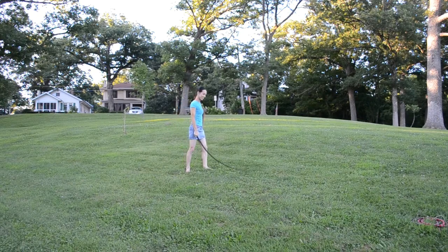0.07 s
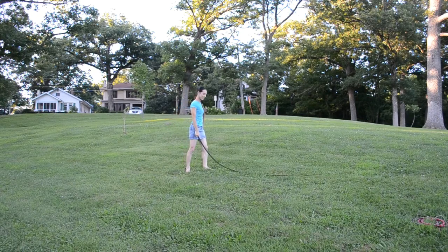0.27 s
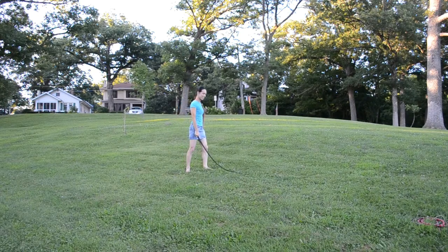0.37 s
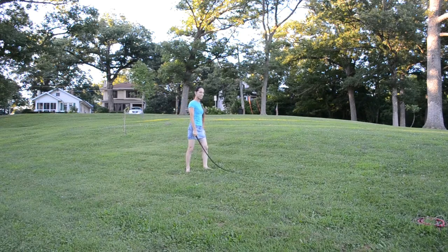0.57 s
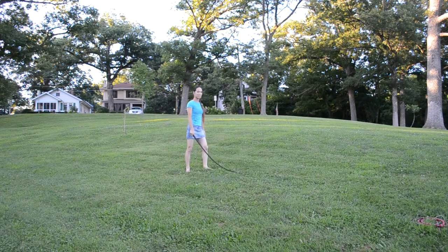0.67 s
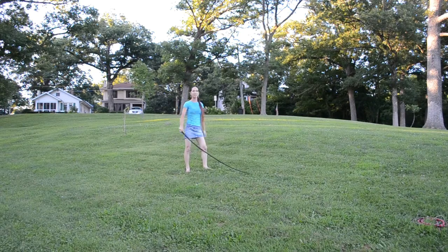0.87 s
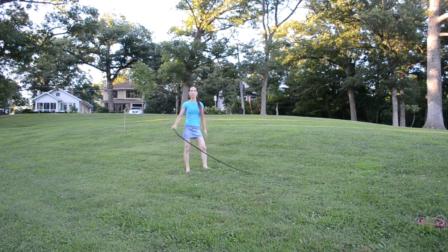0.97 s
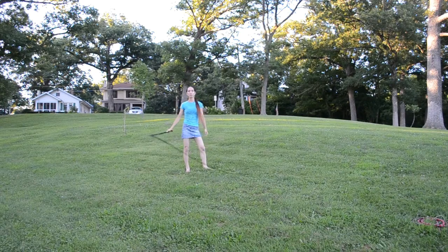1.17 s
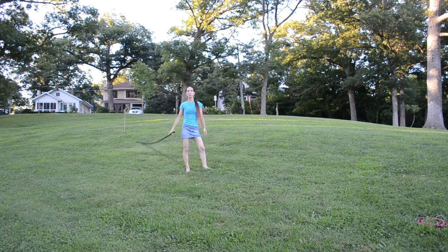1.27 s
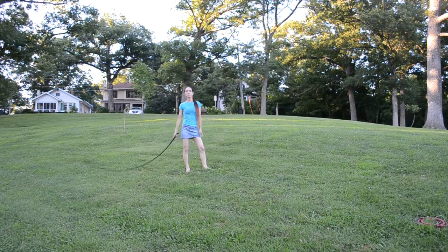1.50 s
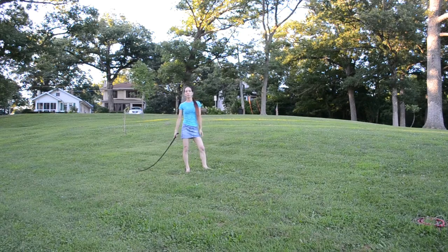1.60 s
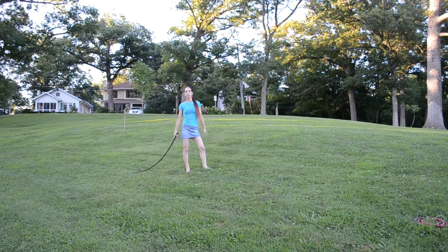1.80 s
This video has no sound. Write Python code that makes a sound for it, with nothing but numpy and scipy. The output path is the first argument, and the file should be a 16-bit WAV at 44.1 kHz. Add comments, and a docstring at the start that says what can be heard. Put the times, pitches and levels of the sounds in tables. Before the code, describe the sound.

Whip crack on an open lawn: faint tick and wind thumps first, then one hard, overloaded crack, clustered echoes and a fading hiss, faint bird whistles, and late light clicks around a dull snap.

```python
"""Soft outdoor air, a faint tick and low wind pops come first, then a whip cracks once on an open lawn.
The crack is a run of pressure jumps; trees and houses return it as coloured fronts and a fading noise hiss.
Shaped noise makes the air, wind rumble, far insects, rustles and one low hum; gliding sines, the far whistles.
Later comes a duller snap, a rounded push with short ringing modes, among small damped-sine ticks."""
import sys
import numpy as np
from scipy import signal
from scipy.io import wavfile

SR = 44100
rng = np.random.default_rng(int(sys.argv[2]) if len(sys.argv) > 2 else 0)


def pcm_store(signal):
    """Save signal as 16-bit PCM."""
    levels = np.round(np.clip(np.atleast_2d(signal), -1, 1) * 32767)
    wavfile.write(sys.argv[1], SR, levels.astype(np.int16).T)


N = 81585  # length in samples

# Spectrum of the open air, shape only: pitch_hz, level_db (per Hz)
AIR_SPECTRUM = [(40, -23), (80, -13.5), (200, -11), (500, -6), (1000, -6.5), (1500, -12.5), (2500, -15),
                (4500, -21), (8000, -25.5), (10000, -26.5), (11500, -32.5)]
AIR_DB = -56.5
INSECT_HZ, INSECT_WIDTH_HZ, INSECT_DB = 5650, 580, -69
AIR_DROOP_HZ = 9700

# Loudness curve of the wind rumble: time_s, level_db
WIND_CURVE = [(0.0, -53), (0.108, -50.5), (0.144, -57.5), (0.23, -56), (0.272, -47), (0.35, -65),
              (0.412, -50.5), (0.534, -54.5), (0.582, -46.5), (0.716, -67), (0.736, -56.5), (0.86, -56.5),
              (0.9, -75.5), (1.02, -61.5), (1.046, -69), (1.2, -58), (1.328, -70), (1.426, -54.5),
              (1.458, -62), (1.736, -64.5), (1.756, -76), (1.85, -71)]
WIND_LOW_HZ, WIND_HIGH_HZ, WIND_LUMPS_DB = 44.6, 131.4, 3
# Wind pops on the microphone: centre_s, level_db, pitch_hz, width_ms (at half height)
WIND_POPS = [(0.075, -30, 230, 2.5), (0.081, -28.5, 179, 6), (0.0932, -38, 172, 4), (.104, -23, 194, 3.7),
             (0.12, -50, 149, 3.8), (0.1855, -55, 177, 5), (0.2791, -28, 129, 6), (0.286, -26, 155, 4.8),
             (0.414, -47.5, 132, 5.7), (0.4293, -35, 155, 6.9), (0.46, -51, 164, 4.4),
             (0.5005, -37.5, 156, 5.3), (0.529, -41, 167, 5.2), (0.552, -31, 263, 2.1),
             (0.556, -46, 198, 3), (0.5838, -26.5, 179, 2.95), (0.597, -56, 136, 3.4),
             (0.6258, -38.5, 167, 6.6), (0.6655, -38.5, 208, 2.8), (0.7438, -39, 155, 7.9),
             (0.802, -37.5, 148, 3.7), (0.849, -39.5, 200, 3.3), (1.1503, -44, 142, 7.2),
             (1.191, -43, 197, 3.3), (1.234, -45, 203, 3.6), (1.4264, -44.5, 138, 4.9),
             (1.6468, -48.5, 166, 4.1), (1.716, -43, 277, 2.6)]
POP_PHASE_RAD = 1.35  # push first, then suction

# Falling whistles, mostly birds: start_s, length_s, from_hz, to_hz, level_db
WHISTLES = [(.672, .065, 2000, 1880, -66), (0.712, 0.035, 4190, 4170, -71), (.73, 0.028, 3720, 2870, -75),
            (0.83, 0.036, 3760, 2710, -71), (0.934, 0.048, 3780, 2420, -69),
            (1.044, .044, 3770, 2650, -69.5), (1.647, .017, 1420, 1050, -57), (1.75, .035, 2350, 2120, -70),
            (1.812, .016, 4080, 4060, -66), (1.824, .028, 4060, 2750, -64),
            (1.216, 0.053, 2394, 2356, -66.5), (1.268, .09, 2300, 1720, -70),
            (1.36, .11, 1702, 1600, -69.5)]
WHISTLE_HOLD = 1.1  # exponent: above 1 the pitch lingers at the top before it falls
WHISTLE_FLUTTER_DB = 1.5

# Rustles, and one low narrow hum near 300 Hz: centre_s, length_s, level_db, low_hz, high_hz
RUSTLE_AND_HUM_SWELLS = [(0.038, 0.017, -63.5, 1000, 10700), (1.292, 0.19, -63.5, 279, 330),
                         (0.193, 0.047, -55, 500, 2500), (0.243, 0.015, -44, 1000, 10000),
                         (0.289, 0.019, -42, 1480, 3940), (0.633, 0.11, -62.5, 2770, 4170),
                         (1.426, 0.094, -67, 6450, 10900), (1.408, .05, -67.5, 7040, 7800),
                         (1.6, 0.069, -76, 700, 2000), (1.63, 0.012, -46.5, 700, 3000),
                         (1.669, 0.017, -50.5, 1000, 4370), (1.697, 0.012, -47.5, 1200, 10500),
                         (1.728, 0.03, -57, 2100, 2600), (1.735, 0.046, -63, 3920, 4430)]

# Small ticks: start_s, level_db, pitch_hz, t60_s
SMALL_TICKS = [(.032, -44.5, 1550, 0.0088), (.1598, -25.5, 870, 0.0022), (1.532, -45.5, 950, 0.022),
               (1.5484, -33.5, 1230, 0.0037), (1.561, -35.5, 1204, 0.02), (1.5824, -38, 900, 0.0076),
               (1.5995, -42, 1210, .008), (1.6625, -37, 930, 0.014), (1.6628, -36, 3000, 0.009),
               (1.6626, -38, 1950, .008), (1.7908, -30, 610, 0.0089), (1.8365, -48, 710, .012)]
TICK_CUT_HZ = 480  # low cut shared with the snap's ring and hiss

# Ringing modes of the duller snap: pitch_hz, level_db, t60_s
SNAP_RINGS = [(633, -22, 0.011), (960, -35.5, 0.02), (1630, -22.5, 0.0096), (2740, -31, 0.0075),
              (3400, -34, .007)]
SNAP_S, SNAP_DB, SNAP_MS, PUSH_CUT_HZ = 1.63205, -7.5, 0.11, 360
SNAP_HISS_DB, SNAP_HISS_T60_S = -33, 0.019
SNAP_TAIL_DB, SNAP_TAIL_T60_S = -54, 0.71

# Spectrum of the scattered return, shape only: pitch_hz, level_db (per Hz)
TAIL_SPECTRUM = [(300, -9.5), (500, -3), (700, -18), (1000, -5), (1600, -3), (2400, -8), (5000, -8),
                 (9200, -7.5), (11500, -26)]
# Fade of the scattered return across the spectrum: pitch_hz, t60_s
TAIL_FADE = [(500, 1.55), (1500, 1), (3000, 1.69), (5500, 0.85), (8000, 0.62), (11000, 0.36)]
TAIL_START_S, TAIL_DB, TAIL_LUMPS_DB = .2045, -45, 2
# Loudness curve of the late narrow return from far off: time_s, level_db
FAR_CURVE = [(0.564, -58), (.6, -58), (.65, -59), (.685, -55), (.72, -62), (.74, -74), (.9, -66.5),
             (.96, -75), (.98, -78)]
FAR_HZ, FAR_WIDTH_HZ, FAR_BREAKS_DB = 1872, 315, 3

# Echoes off trunks and walls: arrival_s, level_db, centre_hz, smear_t60_s
ECHO_RETURNS = [(0.2078, -28, 2800, 0.045), (0.225, -27, 2720, 0.01), (0.2306, -34, 3020, 0.011),
                (.2429, -24, 1940, 0.039), (0.2514, -32, 2500, 0.018), (0.2661, -21.5, 2200, 0.021),
                (0.2717, -26, 2280, 0.026), (0.2788, -27.5, 2350, 0.019), (0.285, -29, 2500, 0.03),
                (.2905, -33, 2600, .06), (0.345, -38, 1770, 0.05), (0.376, -43, 2000, 0.04),
                (0.464, -51, 1500, 0.015), (0.5632, -33, 2300, .012), (.618, -47, 2440, 0.018),
                (.625, -45, 3000, 0.023)]
ECHO_TOP_DB, ECHO_TOP_HZ, ECHO_GRAIN_DB = -10, 7000, 3  # treble edge and grain of each echo

# Shock fronts of the whip tip and its bounces off the grass:
# arrival_s, level_db, suction_before_ms, push_after_ms
SHOCK_FRONTS = [(.20377, 2.5, .32, .39), (.2045, -2, .29, .12), (.20472, -1, .04, .06),
                (.20495, 1, .07, .11), (.20523, -5, .11, .06), (.2055, -12, .13, .03),
                (.20615, -14, .06, .24), (.20678, -18, .38, .42), (.20755, -23, .3, .2)]
CRACK_FRAY_DB, CRACK_FRAY_T60_S = -17, .009  # ragged noise behind the fronts
THUMP_HZ, THUMP_DB, THUMP_T60_S = 430, -15, .013  # low body of the crack
BODY_CUT_HZ = 220

OVERLOAD = .8  # level the input saturates towards
MIC_DROOP_HZ, CUTOFF_HZ = 11480, 12000


def amp(db):
    """Decibels to linear gain."""
    return 10 ** (np.asarray(db) / 20)


def unit(x):
    """Scale to an rms of 1."""
    return x / np.sqrt(np.mean(x ** 2) + 1e-20)


def at_hz(points, hz):
    """Read a curve along a logarithmic pitch axis."""
    pitches, values = np.array(points).T
    return np.interp(np.log(hz), np.log(pitches), values)


def band(x, low_hz, high_hz):
    """Keep what lies between two pitches."""
    sos = signal.butter(2, [low_hz, min(high_hz, SR * .45)], "band", fs=SR, output="sos")
    return signal.sosfilt(sos, x)


def cut(x, hz, kind, order):
    """Low-pass or high-pass filter."""
    return signal.sosfilt(signal.butter(order, hz, kind, fs=SR, output="sos"), x)


def band_noise(low_hz, high_hz):
    """Steady noise between two pitches, rms 1."""
    return unit(band(rng.standard_normal(N), low_hz, high_hz))


def drift(rate_hz):
    """Random wander of spread 1: noise through two equal one-pole smoothers."""
    r = np.exp(-2 * np.pi * rate_hz / SR)
    wander = signal.lfilter([1], [1, -2 * r, r * r], rng.standard_normal(N + SR))
    return unit(wander[SR:])  # the first second lets the smoother settle


def decay(t, t60):
    """Silent before 0, then dying away by 60 dB per t60."""
    return (t >= 0) * amp(-60 * np.clip(t, 0, None) / t60)


def shock(t, before_ms, after_ms):
    """Suction that deepens, a jump, a push that fades."""
    jump = np.tanh(2 * t * SR)
    suction = 1.71 * (1 + 1000 * t / before_ms)
    push = 1 - (1000 * t / after_ms) ** 2
    return jump * np.clip(np.where(t < 0, suction, push), 0, None)


def coloured(spectrum, gain):
    """Third-octave bands of noise, each with its own level and moving gain."""
    edges = 30 * 2 ** (np.arange(27) / 3)
    mids = np.sqrt(edges[1:] * edges[:-1])
    levels = amp(at_hz(spectrum, mids))
    white = rng.standard_normal((2, N))  # neighbouring bands take different noise
    out = np.zeros(N)
    for k, (hz, level) in enumerate(zip(mids, levels)):
        out += level * gain(hz) * band(white[k % 2], edges[k], edges[k + 1])
    return out / np.sqrt(np.sum(levels ** 2 * np.diff(edges)) * 2 / SR)


def air():
    """Far traffic and leaves as drifting noise bands, with a narrow hiss of insects."""
    bed = amp(AIR_DB) * coloured(AIR_SPECTRUM, lambda hz: amp(1.83 * drift(9.3)))
    insects = band_noise(INSECT_HZ - INSECT_WIDTH_HZ / 2, INSECT_HZ + INSECT_WIDTH_HZ / 2)
    insects *= amp(INSECT_DB + 1.65 * drift(20))
    return cut(bed + insects, AIR_DROOP_HZ, "low", order=6)


def wind(t):
    """Single low pops, short bell-shaped bursts of a sine, over a lumpy noise rumble."""
    level_db = np.interp(t, *np.transpose(WIND_CURVE)) + WIND_LUMPS_DB * drift(32.5)
    out = amp(level_db) * band_noise(WIND_LOW_HZ, WIND_HIGH_HZ)
    for s, db, hz, ms in WIND_POPS:
        bell = np.exp(-np.log(16) * (1000 * (t - s) / ms) ** 2)
        out += amp(db) * bell * np.cos(2 * np.pi * hz * (t - s) + POP_PHASE_RAD)
    return out


def whistles(t):
    """Sines that glide downward, swelling and fading, with a fluttering level."""
    out = np.zeros(N)
    for s, length, from_hz, to_hz, db in WHISTLES:
        u = np.clip((t - s) / length, 0, 1)
        hz = from_hz + (to_hz - from_hz) * np.sin(np.pi / 2 * u ** WHISTLE_HOLD) ** 2
        swell = np.sin(np.pi * u) ** 0.38
        out += amp(db + 6.5) * swell * np.sin(2 * np.pi * np.cumsum(hz) / SR)
    return out * amp(WHISTLE_FLUTTER_DB * drift(40))


def rustles_and_hum(t):
    """Bell-shaped swells of grainy noise: short rustles, and a low hum where the band is narrow near 300 Hz."""
    grains = rng.standard_normal(N) * amp(2.2 * drift(216))
    out = np.zeros(N)
    for s, length, db, low_hz, high_hz in RUSTLE_AND_HUM_SWELLS:
        swell = np.exp(-(2 * (t - s) / length) ** 2)
        out += amp(db) * swell * unit(band(grains, low_hz, high_hz))
    return out


def ring(t, s, db, hz, t60):
    """One struck mode: a sine that starts at once and dies away."""
    return amp(db) * decay(t - s, t60) * np.sin(2 * np.pi * hz * (t - s))


def ticks(t):
    """Small damped ticks, one ringing mode each."""
    out = sum(ring(t, *tick) for tick in SMALL_TICKS)
    return cut(out, TICK_CUT_HZ, "high", order=2)


def snap(t):
    """A rounded push with short ringing modes, a brief hiss and a longer scatter of noise."""
    u = 1000 * (t - SNAP_S) / SNAP_MS
    push = amp(SNAP_DB) * (np.exp(-u ** 2) - 0.3 * np.exp(-(u / 3.67) ** 2))
    hiss = amp(SNAP_HISS_DB) * decay(t - SNAP_S, SNAP_HISS_T60_S) * band_noise(4200, 9000)
    scatter = amp(SNAP_TAIL_DB) * decay(t - SNAP_S, SNAP_TAIL_T60_S) * band_noise(620, 6300)
    modes = sum(ring(t, SNAP_S, db, hz, t60) for hz, db, t60 in SNAP_RINGS)
    fade = cut(hiss + scatter + modes, TICK_CUT_HZ, "high", order=2)
    return cut(push, PUSH_CUT_HZ, "high", order=3) + fade


def tail(t):
    """Scatter from leaves and trunks, its fade time set by pitch, and one late narrow return."""
    lumps = amp(TAIL_DB + TAIL_LUMPS_DB * drift(40))
    near = lumps * coloured(TAIL_SPECTRUM, lambda hz: decay(t - TAIL_START_S, at_hz(TAIL_FADE, hz)))
    far = band_noise(FAR_HZ - FAR_WIDTH_HZ / 2, FAR_HZ + FAR_WIDTH_HZ / 2)
    s, db = np.transpose(FAR_CURVE)
    far_db = np.interp(t, s, db, -120, -120) + FAR_BREAKS_DB * drift(50)
    return near + amp(far_db) * far


def echoes(t):
    """Each reflector returns a short front and a smear of noise, in its own colour."""
    out = np.zeros(N)
    grains = unit(rng.standard_normal(N) * amp(ECHO_GRAIN_DB * drift(390)))
    for s, db, hz, t60 in ECHO_RETURNS:
        i = slice(int(s * SR) - 50, int(s * SR) + 4000)  # work only around this echo
        u = t[i] - s
        back = shock(u, 450 / hz, 500 / hz) + 0.87 * decay(u, t60) * grains[i]
        body = band(back, hz / 1.85, hz * 1.63)
        treble = amp(ECHO_TOP_DB) * band(back, hz * 1.43, ECHO_TOP_HZ)
        out[i] += amp(db) * (body + treble)
    return out


def crack(t):
    """The tip breaks the sound barrier: a run of shock fronts with a low thump and ragged noise behind."""
    fronts = sum(amp(db) * shock(t - s, before, after) for s, db, before, after in SHOCK_FRONTS)
    fray_s = SHOCK_FRONTS[1][0]  # the noise starts with the second front
    fray = amp(CRACK_FRAY_DB) * decay(t - fray_s, CRACK_FRAY_T60_S) * band_noise(1200, 9000)
    thump = ring(t, SHOCK_FRONTS[0][0], THUMP_DB, THUMP_HZ, THUMP_T60_S)
    return cut(fronts + fray + thump, BODY_CUT_HZ, "high", order=2)


def scene():
    """Mix every layer, from the background to the whip."""
    t = np.arange(N) / SR
    background = air() + wind(t) + whistles(t) + rustles_and_hum(t)
    small_hits = ticks(t) + snap(t)
    whip = tail(t) + echoes(t) + crack(t)
    return (background + small_hits + whip)[None]


def record(dry):
    """The crack overloads the input, the treble droops and the top is cut without delay."""
    dry = OVERLOAD * np.tanh(dry / OVERLOAD)
    dry = signal.sosfiltfilt(signal.butter(6, MIC_DROOP_HZ, fs=SR, output="sos"), dry)
    return signal.sosfiltfilt(signal.cheby2(14, 28, CUTOFF_HZ, fs=SR, output="sos"), dry)


dry = scene()
out = record(dry)
pcm_store(out)
```